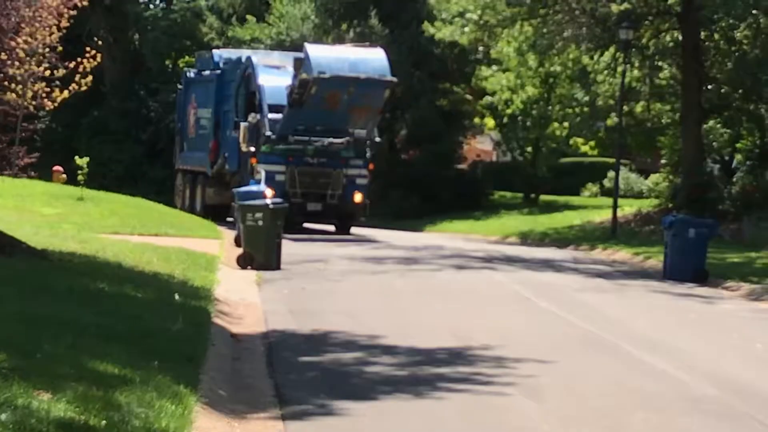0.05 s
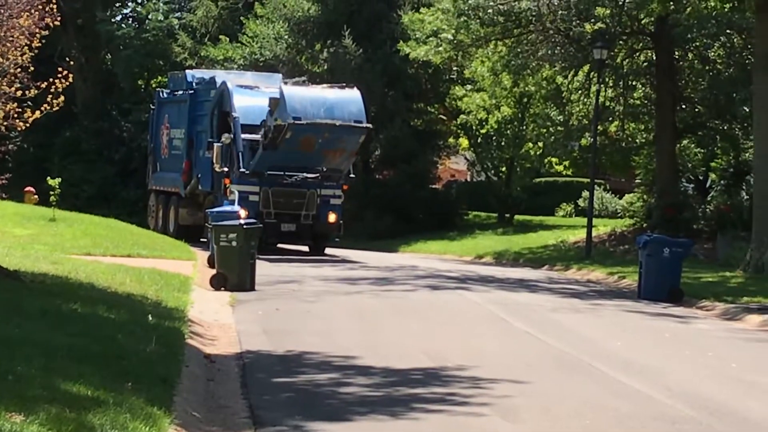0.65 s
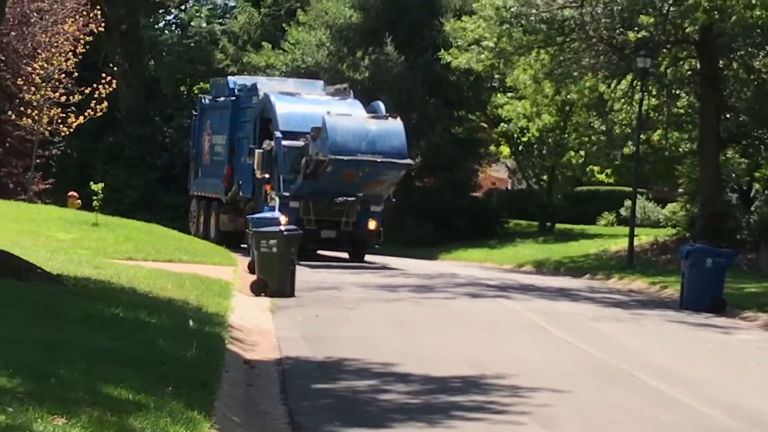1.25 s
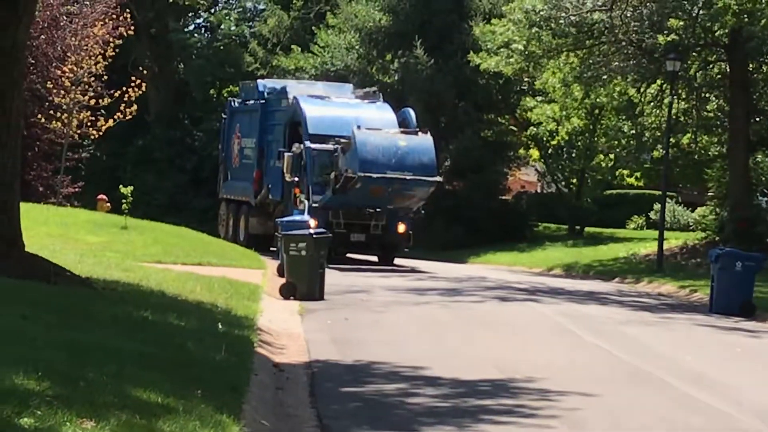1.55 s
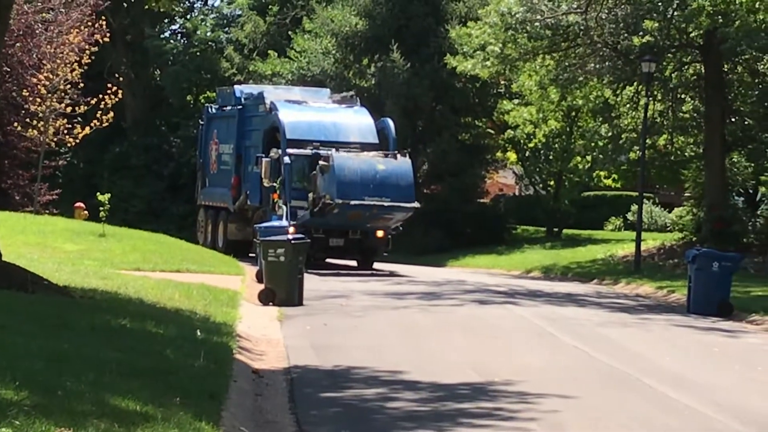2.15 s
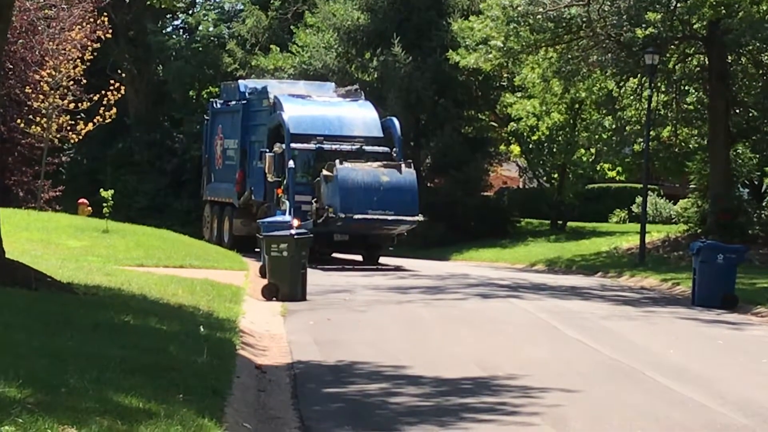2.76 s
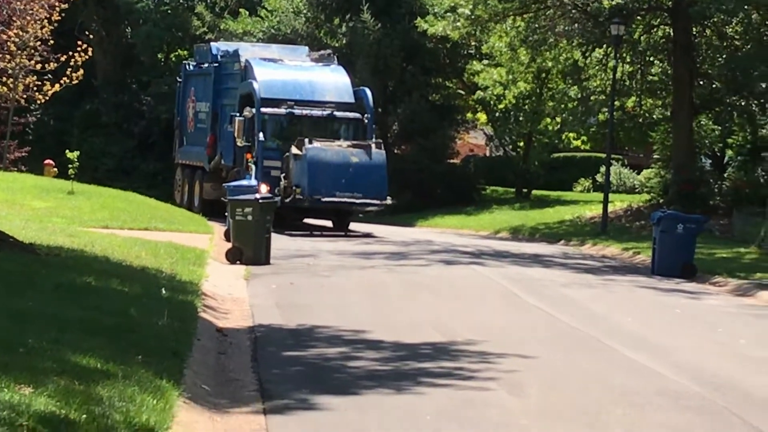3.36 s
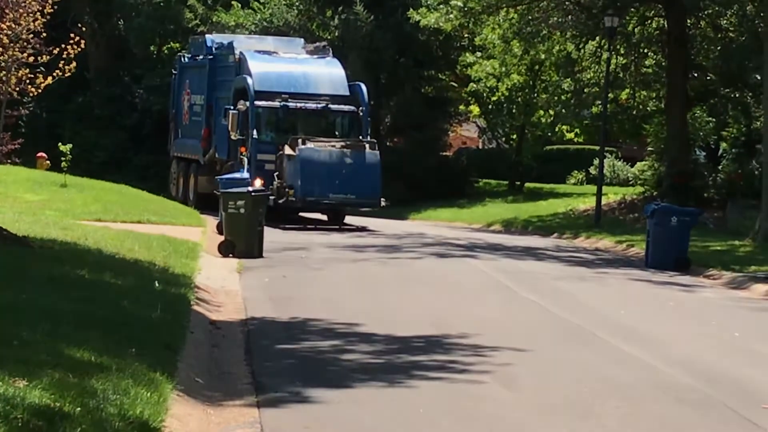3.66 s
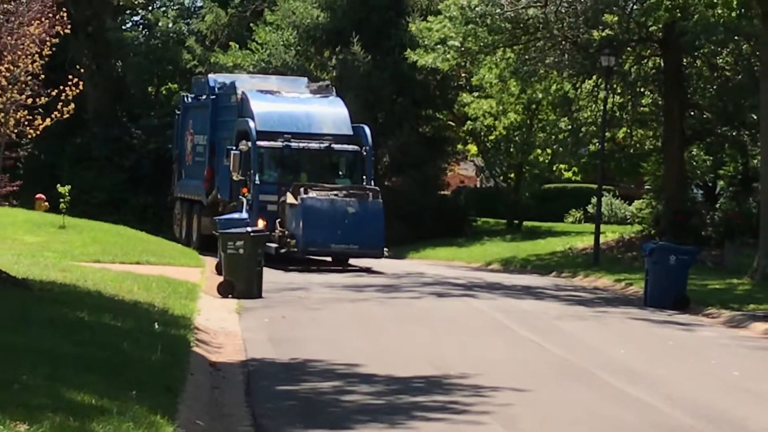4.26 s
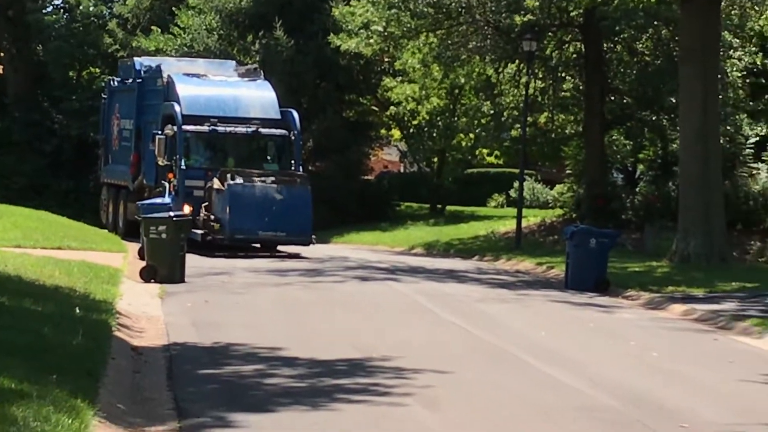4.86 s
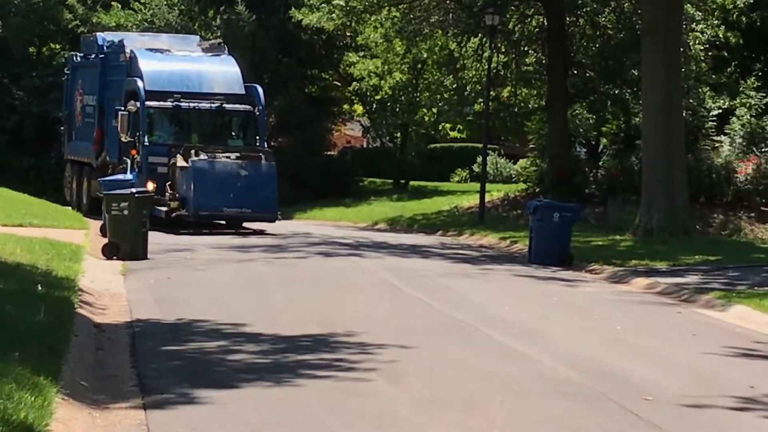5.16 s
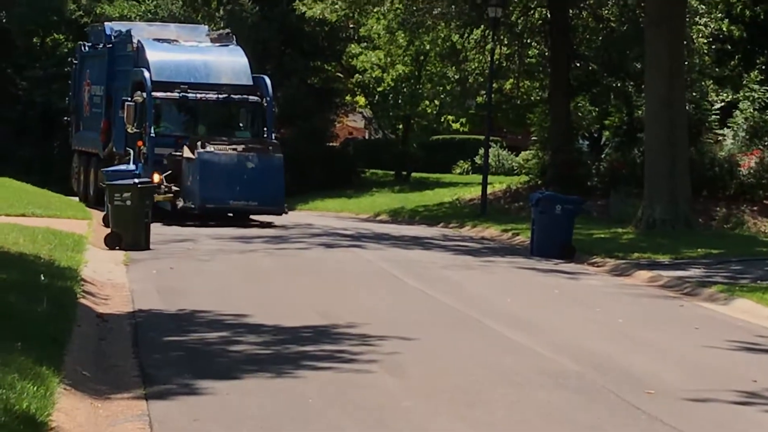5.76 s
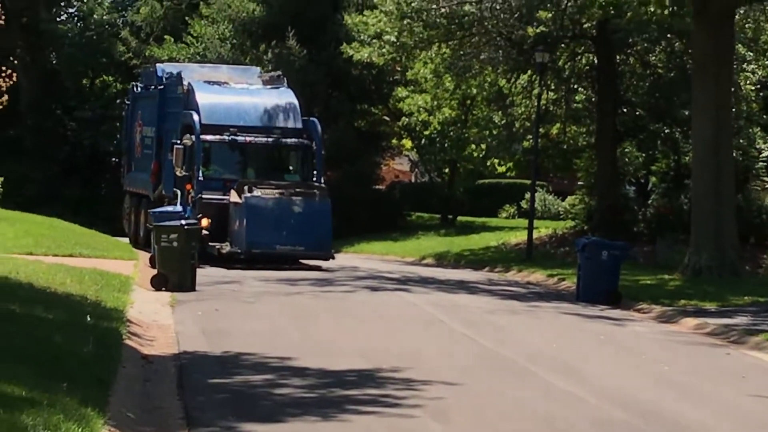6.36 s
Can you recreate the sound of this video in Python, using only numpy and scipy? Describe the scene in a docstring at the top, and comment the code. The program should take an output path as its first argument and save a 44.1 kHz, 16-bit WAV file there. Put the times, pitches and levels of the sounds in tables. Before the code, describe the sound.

On a tree-lined street, a garbage truck's engine throbs loudly before easing down to idle with a burst of compressed air. Faint hydraulic whines and three tiny high chirps follow. Then the truck rolls slowly ahead, its brakes hissing and squealing, its hollow bin booming and loose metal clanking, ending in high brake shrieks and hard knocks that scatter off trees and houses.

```python
"""A garbage truck's diesel roars at raised idle, then drops to idle as its hydraulics whine and a valve vents air.
Uneven cylinder firings make the exhaust note and pulse the engine's roar, rumble and clatter.
After three faint high chirps, perhaps a bird or insect, the truck creeps forward on brakes whose linings
rasp, hiss and squeal on the drums, while the empty steel carry bin booms, the lift arms clank and loose
parts chatter. Trees and house fronts scatter the whines, squeals and knocks along the street."""
import sys
import numpy as np
from scipy import signal
from scipy.fft import rfft, irfft
from scipy.io import wavfile
from scipy.ndimage import uniform_filter1d

SR = 44100
rng = np.random.default_rng(int(sys.argv[2]) if len(sys.argv) > 2 else 0)


def to_wav(sig):
    """Store sig (one row per channel, or 1-D mono) as 16-bit WAV at the path in sys.argv[1].

    Samples outside -1..1 are clipped; the rate is SR.
    """
    pcm = np.clip(np.atleast_2d(sig), -1, 1) * 32767
    pcm = np.round(pcm).astype(np.int16)
    wavfile.write(sys.argv[1], SR, pcm.T)  # frames by channels


N = 286650
T = np.arange(N) / SR
TOP_HZ = 15720  # high cut of the mix


def undb(db):
    """Decibels to gain."""
    return 10 ** (np.asarray(db) / 20)


def unit(x):
    """Scale to rms 1."""
    return x / np.sqrt(np.mean(x ** 2) + 1e-20)


def walk(rate_hz):
    """Smooth random modulation with rms 1."""
    step = max(int(SR / rate_hz), 2)
    stairs = np.repeat(rng.standard_normal(N // step + 1), step)
    return unit(uniform_filter1d(stairs, step)[:N])


def ramp(start, length):
    """Linear rise from 0 to 1."""
    return np.clip((T - start) / length, 0, 1)


def fade(start, t60, attack, hold=0):
    """Percussive envelope: quick attack, optional hold, exponential decay."""
    age = np.maximum(T - start, 0)
    decay = np.log(1000) * np.maximum(age - hold, 0) / t60
    return (1 - np.exp(-age / attack)) * np.exp(-np.minimum(decay, 40))


def swell(age, length, edge_db):
    """Envelope that peaks at age 0, falls by edge_db towards both ends and closes there."""
    away = np.minimum(np.abs(2 * age / length), 1)
    return undb(-edge_db * away ** 2.33) * np.minimum(10 * (1 - away), 1)


def equalise(x, points, resonances=(), size=8192):
    """Minimum-phase EQ from (f/Hz, gain/dB) points plus resonances; white noise keeps its level."""
    f = np.maximum(np.fft.rfftfreq(size, 1 / SR), 1)
    hz, db = np.transpose(points)
    shape_db = np.interp(np.log(f), np.log(hz), db) - 24 * np.log2(np.maximum(hz[0] / f, 1))
    for centre, width, boost in resonances:
        shape_db = shape_db + boost / (1 + (2 * (f - centre) / width) ** 2)
    cepstrum = irfft(np.log(undb(shape_db)))[:size // 2]
    cepstrum[1:] *= 2
    response = irfft(np.exp(rfft(cepstrum, size)))
    return signal.fftconvolve(x, response / np.linalg.norm(response))[:len(x)]


def street(x, wet_db, t60):
    """Direct sound plus sparse reflections from trunks and house fronts."""
    t = T[:SR]
    echoes = rng.standard_normal(SR) * (rng.random(SR) < .02)
    echoes *= np.exp(-np.log(1000) * t / t60) * (t > .008)
    reverb = signal.fftconvolve(x, echoes / np.linalg.norm(echoes))[:N]
    wet = undb(wet_db)
    return (x + wet * reverb) / np.sqrt(1 + wet ** 2)


# Jolts of the rolling truck: t/s, strength/0-1
ROAD_JOLTS = [(3.3, 0), (3.6, 0.2), (4.88, 0.04), (5.17, 0.98), (5.8, 0.89), (6.0, 0.6), (6.5, 0.41)]


def jolting():
    """How hard the road shakes the truck."""
    return np.interp(T, *np.transpose(ROAD_JOLTS))


def governor(drop_s=1.32, drop_length_s=.7, hunt_period_s=0.788, hunt_fade_s=1.3):
    """Load falls smoothly from 1 to 0; the speed then undershoots and hunts until it settles."""
    load = (1 + np.cos(np.pi * ramp(drop_s, drop_length_s))) / 2
    age = np.maximum(T - drop_s - drop_length_s, 0)
    hunt = -np.sin(2 * np.pi * age / hunt_period_s) * np.exp(-age / hunt_fade_s)
    return load, hunt


# Exhaust partials: multiple of the firing rate, loaded level/dB, idle level/dB
EXHAUST_PARTIALS = [(0.998, -54, -60), (1.88, -51, -69), (2, -52, -51.5), (2.29, -49.5, -64.5),
                    (2.65, -51.5, -65), (3, -43, -70), (3.33, -55.5, -59.5), (4.25, -57.5, -61.5),
                    (5, -57, -61)]
# EQ of the fan and pump roar, the low rumble and the diesel clatter: f/Hz, gain/dB
ROAR_EQ = [(18, -61), (30, -4), (48, -18), (81, -11.5), (187, -1.5), (230, -5.5), (307, -12), (389, -18),
           (575, -13.5), (787, -23.5), (1330, -23), (1550, -25.5), (3680, -31.5), (4500, -32.5),
           (5700, -41.5), (7000, -37.5), (8700, -47.5), (9600, -41), (10500, -54), (11500, -43),
           (15500, -60)]
RUMBLE_EQ = [(22, -48), (35, -5.5), (52, -1), (74, -4), (95, -2.5), (120, -4.5), (150, -12.5), (200, -9.5),
             (300, -18.5), (400, -42), (800, -76)]
CLATTER_EQ = [(180, -16.5), (300, 2), (354, -3), (411, -6), (431, -4), (526, -10.5), (641, -3.5),
              (756, -13), (863, -15.5), (907, -12.5), (1330, -13.5), (1750, -14.5), (3280, -17.5),
              (4420, -22.5), (9600, -30), (10600, -34), (15500, -39.5)]
# Cab resonances: f/Hz, width/Hz, boost/dB
CAB_RESONANCES = [(189, 8.4, 4.5), (434.6, 12, 5.5), (573, 55, 3.5), (984, 296, 6.5), (1380, 85, 5.5)]


def engine(raised_hz=61.48, idle_hz=36.24, hunt_hz=1.41, hunt_db=4.5, scatter_db=3, knock=0.19):
    """Uneven diesel firings give the exhaust note and pulse the noise; fan and pump roar only under load."""
    load, hunt = governor()
    firing_hz = idle_hz + (raised_hz - idle_hz) * load + hunt_hz * hunt
    cycles = np.cumsum(firing_hz * (1 + 0.0046 * walk(14))) / SR
    strengths = undb(scatter_db * rng.standard_normal(1000))
    firing = strengths[cycles.astype(int)] * np.exp(-(cycles % 1) / 0.89)
    gate = unit(1 + knock * unit(firing))
    # under load the note throbs unevenly, every three or four firings
    throb = 1 + 0.24 * load * np.sin(2 * np.pi * cycles / 3.4 + walk(7.3))
    note = 0
    for multiple, loaded_db, idle_db in EXHAUST_PARTIALS:
        gain = throb * undb(idle_db + load * (loaded_db - idle_db) + 2 * walk(18))
        note += np.sqrt(2) * gain * np.sin(2 * np.pi * (multiple * cycles + rng.random()))
    roar = equalise(gate * rng.standard_normal(N), ROAR_EQ, CAB_RESONANCES)
    roar *= undb(-41.5) * load ** 0.64
    rumble = equalise(gate * rng.standard_normal(N), RUMBLE_EQ)
    rumble *= undb(-49 + 0.5 * load + 11.5 * jolting())
    clatter = equalise(gate * rng.standard_normal(N), CLATTER_EQ, CAB_RESONANCES[2:])
    clatter *= undb(-57 + 8 * load + 2 * hunt)
    return (note + rumble) * undb(hunt_db * hunt) + roar + clatter


# Pump whines: peak t/s, length/s, f/Hz, level/dB, waver/share of pitch
PUMP_WHINES = [(2.059, 0.96, 1547, -61.5, 0.031), (2.6, 1.0, 1058, -69, .03),
               (2.87, 0.16, 745, -58.5, .004), (3.07, 0.5, 742, -62.5, .004),
               (4.5, 0.47, 1436, -63.5, 0.0176), (4.5, 0.4, 1790, -67, 0.017)]


def hydraulic_pump(sag_per_s=0.072, flutter_db=1.2):
    """The pump sings in faint, fluttering whines, each sagging a little in pitch."""
    whines = 0
    for s, length, hz, db, waver in PUMP_WHINES:
        pitch = hz * (1 - sag_per_s * (T - s) + waver * walk(260))
        tone = np.sin(2 * np.pi * np.cumsum(pitch) / SR)
        whines += undb(db) * swell(T - s, length, edge_db=9) * tone
    return street(whines * undb(flutter_db * walk(70)), wet_db=0, t60=0.32)


# Air blasts: t/s, level/dB, hold/s, low-band t60/s
AIR_BLASTS = [(1.794, -39.5, 0.046, 0.97), (3.397, -58, 0.037, 0.44)]
# EQ of the jet: f/Hz, gain/dB
JET_EQ = [(600, -14), (1100, -0.5), (2000, -2.5), (2600, 2), (3200, 3.5), (4400, 4.5), (5200, 1.5),
          (6200, 4), (9700, 3), (10500, -0.5), (12800, 0.5), (15500, -8)]
# Outlet resonances: f/Hz, width/Hz, boost/dB
OUTLET_RESONANCES = [(3540, 280, 1.5), (4580, 210, 1), (8330, 130, 3)]


def air_valve(attack_s=0.027, split_hz=9500, treble_t60_share=0.57, flutter_db=0.98):
    """Short jets of compressed air bloom and die away, treble first."""
    hiss = 0
    for side, share in (("low", 1), ("high", treble_t60_share)):
        jet = equalise(rng.standard_normal(N), JET_EQ, OUTLET_RESONANCES)
        band = signal.sosfilt(signal.butter(2, split_hz, side, fs=SR, output="sos"), jet)
        envelope = sum(undb(db) * fade(s, share * t60, attack_s, hold) for s, db, hold, t60 in AIR_BLASTS)
        hiss += band * envelope
    return hiss * undb(flutter_db * walk(70))


# Three faint chirps near 9.4 kHz, then brake lining rasps: peak t/s, length/s, f/Hz, width/Hz, level/dB
CHIRPS_AND_RASPS = [(2.272, .1, 9350, 350, -77), (2.504, .11, 9350, 350, -73),
                    (2.837, 0.091, 9380, 356, -76), (3.26, 0.25, 8040, 1900, -66.5),
                    (3.587, 0.12, 10070, 200, -61), (3.663, 0.31, 7700, 560, -54),
                    (4.13, 0.34, 4500, 350, -64)]


def chirps_and_rasps(grit_db=1.5):
    """Narrow noise bands: faint high chirps, perhaps a bird or insect, then linings rasping on the drums."""
    bursts = 0
    for s, length, hz, width, db in CHIRPS_AND_RASPS:
        bandpass = signal.butter(2, [hz - width / 2, hz + width / 2], "band", fs=SR, output="sos")
        band = unit(signal.sosfilt(bandpass, rng.standard_normal(N)))
        bursts += undb(db) * band * swell(T - s, length, edge_db=13)
    return bursts * undb(grit_db * walk(90))


# EQ of the friction hiss: f/Hz, gain/dB
FRICTION_EQ = [(1500, 3), (2400, -12), (3300, -2.5), (4000, -3.5), (4550, -4), (5200, -9.5), (6300, -6),
               (7100, -2.5), (8000, -5), (9600, -2.5), (10500, -13.5), (12000, -12), (15000, -24)]
# Brake drum resonances: f/Hz, width/Hz, relative boost/dB
DRUM_RESONANCES = [(3530, 110, 6), (4580, 170, 6), (6930, 80, 8), (7120, 70, 7), (7810, 110, 9.5),
                   (8500, 140, 7), (9120, 90, 10), (9670, 110, 8), (9900, 120, 8), (10200, 100, 7),
                   (10600, 110, 8), (11000, 110, 7), (11350, 120, 7)]


def brake_rub(on_s=3.254, attack_s=0.37, off_s=4.5, release_s=0.32, rub_db=-57.5, drag_db=-92):
    """Dragging linings hiss through the drums' resonances, which come and go with the contact."""
    hiss = equalise(rng.standard_normal(N), FRICTION_EQ)
    rings = 0
    for hz, width, boost in DRUM_RESONANCES:
        contact = undb(3 * walk(12))
        ring = signal.lfilter(*signal.iirpeak(hz, hz / width, fs=SR), hiss)
        rings += (undb(boost) - 1) * contact * ring
    pressure = ramp(on_s, attack_s) * (undb(rub_db) * (1 - ramp(off_s, release_s)) + undb(drag_db))
    flutter = undb(2.3 * walk(15))
    return unit(hiss + undb(-2) * rings) * pressure * flutter


# Lift arm and bin hits: t/s, thud level/dB, clank level/dB, low ring f/Hz, high ring f/Hz,
# tilt/dB per octave (the harder the contact, the brighter)
ARM_HITS = [(3.58, -46, -49, 550, 900, -9), (3.606, -44, -45, 600, 900, -15),
            (3.623, -48, -47, 530, 716, -4), (3.872, -40, -51, 556, 1097, -14),
            (3.985, -41, -50, 1130, 1500, -8), (4.02, -45, -43, 594, 1050, -8),
            (4.036, -49, -46.5, 626, 1000, -10), (4.09, -43, -53, 634, 1010, -9),
            (4.953, -44.5, -50.5, 2500, 3100, 4), (5.014, -36, -49, 2500, 3200, 2),
            (5.105, -43.5, -45, 850, 1310, -4.5), (5.186, -38, -43.5, 2530, 3000, 2),
            (5.217, -43.5, -42.5, 400, 596, -4), (5.243, -55, -48, 8800, 11300, 10),
            (5.255, -44, -42, 3140, 3700, -1.5), (5.31, -48, -52, 600, 1000, -7),
            (5.374, -45.5, -42.5, 2200, 2500, -5.5), (5.387, -46, -49, 1160, 1570, -5),
            (5.442, -42, -39, 2420, 3700, -2.5), (5.513, -47, -41, 3200, 5970, 1.5),
            (5.545, -52, -43.5, 2670, 6000, -1.5), (5.583, -59, -39.5, 790, 2000, -6),
            (5.587, -63, -48, 544, 3150, -4), (5.644, -39, -50, 1000, 1900, 2),
            (5.684, -38.5, -37.5, 1080, 2870, 0), (5.72, -46, -49, 1000, 3430, 0),
            (5.751, -41.5, -48, 1000, 3500, -1), (5.768, -51, -40, 587, 964, -6),
            (5.81, -52, -49.5, 1940, 3200, -1), (5.869, -50, -51.5, 600, 6040, -2),
            (5.991, -43, -46, 2500, 4100, 0), (6.035, -62, -48, 2500, 3000, -3.5),
            (6.205, -49, -48.5, 1260, 1630, -5.5), (6.423, -34, -40.5, 2720, 3900, 0),
            (6.446, -39.5, -34.5, 605, 1080, -4), (6.455, -31.5, -35, 560, 1060, -6.5),
            (6.48, -37, -38, 520, 1120, -3)]
# EQ of the body panels and of struck steel: f/Hz, gain/dB
PANEL_EQ = [(70, -18), (130, 8), (200, 5.5), (310, -3), (420, -8.5), (620, -4.5), (800, -15), (1050, -10.5),
            (1600, -17), (2500, -26.5), (6000, -48.5)]
STEEL_EQ = [(600, 0), (1500, -4), (2500, 0.5), (4200, -0.5), (5500, -5), (7500, -6), (10000, -15.5),
            (15500, -31)]


def ironwork(shake_db=-47, aftershake_db=-4.5, ring_width_hz=240, ring_db=9.5, contacts_per_s=300):
    """Knocks thud in the panels and ring the steel; loose parts chatter with the jolts and after each hit."""
    thuds, clanks = 0, np.zeros(N + SR)
    shake_power = (undb(shake_db) * jolting() ** 1.46) ** 2
    strike = fade(0, t60=.042, attack=0.00083, hold=.007)[:SR // 2]
    for s, thud_db, clank_db, low_hz, high_hz, tilt in ARM_HITS:
        thuds += undb(thud_db) * fade(s, t60=0.18, attack=0.0096)
        shake_power += (undb(thud_db + aftershake_db) * fade(s, t60=0.65, attack=0.0025)) ** 2
        spectrum = [(hz, db + tilt * np.log2(hz / low_hz)) for hz, db in STEEL_EQ]
        rings = [(hz, ring_width_hz, ring_db) for hz in (low_hz, high_hz)]
        clank = equalise(rng.standard_normal(len(strike)) * strike, spectrum, rings)
        i = int(s * SR)
        clanks[i:i + len(strike)] += undb(clank_db) * clank * np.linalg.norm(strike) / np.linalg.norm(clank)
    contacts = (rng.random(N) < contacts_per_s / SR) * undb(3 * np.minimum(rng.exponential(size=N), 3))
    tick = np.exp(-T[:SR // 10] / 0.0054)
    chatter = unit(signal.fftconvolve(contacts, tick)[:N]) * np.sqrt(shake_power)
    panels = equalise((thuds + chatter) * rng.standard_normal(N), PANEL_EQ)
    jingle = equalise(chatter * rng.standard_normal(N), STEEL_EQ) * undb(-11) * np.sqrt(jolting())
    # the arms face the listener, so their clanks arrive drier than the body's rattle
    return street(panels + jingle, wet_db=-2.5, t60=0.55) + street(clanks[:N], wet_db=-4.5, t60=0.46)


# Flexes of the empty bin: t/s, level/dB, centre f/Hz
BIN_FLEXES = [(3.579, -27, 152), (3.612, -34, 230), (3.646, -28, 114), (3.721, -27, 113), (3.867, -30, 122),
              (3.915, -33.5, 170), (4.015, -33, 159), (4.094, -28.5, 135), (4.167, -37, 137),
              (4.264, -34.5, 126), (4.77, -29, 77), (5.094, -21, 81), (5.215, -28, 117), (5.388, -20, 76),
              (5.68, -25.5, 105), (5.756, -29, 138), (6.235, -32, 72), (6.465, -29, 127)]
# Its wall modes: f/Hz, t60/s
WALL_MODES = [(52, 0.38), (73, 0.14), (95, 0.077), (121.5, 0.57), (137, 0.52), (184, 0.2), (222, 0.54),
              (262, 0.25)]


def bin_booms(reach_octaves=0.28, attack_s=0.0039):
    """Soft pushes ring the bin's wall modes, most strongly those near each push's own pitch."""
    booms = np.zeros(N + SR)
    t = T[:SR]
    mode_hz, t60 = np.transpose(WALL_MODES)
    envelopes = np.exp(-np.log(1000) * t / t60[:, None]) * (1 - np.exp(-t / attack_s))
    rings = np.sin(2 * np.pi * mode_hz[:, None] * t) * envelopes
    for s, db, hz in BIN_FLEXES:
        share = 1 / (1 + (np.log2(mode_hz / hz) / reach_octaves) ** 2)
        i = int(s * SR)
        booms[i:i + SR] += undb(db) * (share / np.linalg.norm(share)) @ rings
    return booms[:N]


# Brake squeals: peak t/s, length/s, f/Hz, glide/Hz per s, level/dB
DRUM_SQUEALS = [ (3.657, .1, 9330, -200, -53), (3.77, 0.15, 9308, -100, -50), (3.863, .12, 9270, -200, -59),
                (3.66, 0.11, 3740, 0, -56), (3.762, 0.071, 3746, -200, -53),
                (3.825, .048, 3756, 300, -48.5), (3.882, 0.044, 3772, -200, -49.5),
                (3.943, .04, 3755, 2, -65), (4.022, 0.054, 3755, 0, -60), (3.795, .09, 6170, -600, -52.5),
                (3.845, .05, 6150, 0, -57), (3.915, 0.093, 6148, 0, -52), (3.995, 0.1, 6175, 708, -63),
                (4.57, 0.79, 9640, -230, -65.5), (4.741, 0.53, 6457, -59, -52),
                (4.647, 0.48, 8545, -130, -70), (4.92, 0.49, 9550, -100, -60),
                (4.958, 0.1, 5425, -100, -65), (5.056, 0.063, 5405, -100, -58),
                (5.114, 0.065, 5390, -100, -55), (5.18, .06, 5392, 0, -66),
                (5.305, 0.066, 5410, -60, -61.5), (5.519, 0.15, 5428, 4, -58),
                (6.122, .16, 9260, -300, -62), (6.17, 0.16, 13980, 298, -75),
                (6.196, 0.11, 8530, -300, -62), (6.238, 0.13, 11340, 0, -68), (6.277, 0.17, 7210, 200, -60),
                (6.29, 0.16, 8380, 202, -63), (6.35, 0.25, 8160, 0, -61.5), (6.29, 0.18, 12500, 700, -61),
                (6.42, 0.22, 12700, 200, -68), (6.42, 0.2, 13210, 0, -68), (6.38, 0.2, 15500, 1498, -76),
                (6.447, 0.23, 6420, 398, -53.5), (6.49, 0.08, 10470, 0, -63)]


def brake_squeals(octave_db=-24, stutter_db=7.5, full_stutter_s=0.22, waver=0.0018):
    """Linings lock onto one drum mode after another; each squeal swells, glides and dies, long ones stutter."""
    squeals = np.zeros(N)
    wander, flutter = walk(160), walk(55)
    for s, length, hz, glide, db in DRUM_SQUEALS:
        on = np.abs(T - s) < length / 2
        age, shift = T[on] - s, rng.integers(N)
        # a fast-gliding squeal is less firmly locked and wavers more
        waver_hz = waver * hz + 0.015 * abs(glide)
        pitch = hz + glide * age + waver_hz * np.roll(wander, shift)[on]
        # friction caps the swing, so the stutter dips further than it swells
        stutter = np.minimum(np.roll(flutter, shift)[on], 1) * min(length / full_stutter_s, 1)
        gain = undb(db + stutter_db * stutter) * swell(age, length, edge_db=16)
        phase = 2 * np.pi * np.cumsum(pitch) / SR
        octave = undb(octave_db) * (2 * hz < TOP_HZ)
        squeals[on] += np.sqrt(2) * gain * (np.sin(phase) + octave * np.sin(2 * phase))
    return street(squeals, wet_db=-7.5, t60=0.76)


# Pitch and level curves of the two shrieking brakes: t/s, f/Hz, level/dB
LOW_BRAKE = [(5.62, 6300, -79), (5.65, 6300, -53), (5.755, 6240, -61), (5.772, 6230, -43),
             (5.815, 6170, -65), (5.837, 6190, -49), (5.888, 6190, -63), (5.91, 6250, -45.5),
             (5.96, 6155, -54), (5.985, 6256, -39), (6.03, 6325, -55), (6.07, 6390, -40), (6.12, 6350, -66),
             (6.24, 6200, -68)]
HIGH_BRAKE = [(6.1, 9600, -72), (6.13, 9550, -51), (6.17, 9700, -55), (6.21, 9770, -50), (6.266, 9780, -57),
              (6.29, 9700, -46), (6.32, 9640, -62), (6.39, 9735, -40), (6.42, 9760, -57),
              (6.446, 9970, -54), (6.52, 10150, -72)]


def stopping_shrieks(waver=0.00209, flutter_db=5, octave_db=-66.5, grip_s=5.88):
    """Two brakes shriek as the truck stops; echoes of the earlier pitch beat against each gliding tone."""
    shrieks = 0
    for brake in (LOW_BRAKE, HIGH_BRAKE):
        s, hz, db = np.transpose(brake)
        pitch = np.interp(T, s, hz) * (1 + waver * walk(220))
        phase = 2 * np.pi * np.cumsum(pitch) / SR
        on = (T > s[0]) & (T < s[-1])
        gain = undb(np.interp(T, s, db) + flutter_db * np.minimum(walk(70), 1)) * on
        # the lower brake adds its octave while the lining grips hardest
        grip = swell(T - grip_s, length=0.46, edge_db=5)
        octave = undb(octave_db + 4 * walk(40)) * grip * (2 * hz.mean() < TOP_HZ)
        shrieks += np.sqrt(2) * (gain * np.sin(phase) + octave * np.sin(2 * phase))
    return street(shrieks, wet_db=-2.5, t60=0.55)


def scene():
    """The whole street, mixed to mono."""
    highs = brake_squeals() + stopping_shrieks() + chirps_and_rasps() + brake_rub()
    return (engine() + hydraulic_pump() + air_valve() + highs + bin_booms() + ironwork())[None]


def record(dry):
    """A low cut drops the deepest bass and a steep high cut trims the top."""
    low_cut = signal.butter(6, 39, "high", fs=SR, output="sos")
    high_cut = signal.ellip(12, .1, 80, TOP_HZ, fs=SR, output="sos")
    return signal.sosfilt(high_cut, signal.sosfilt(low_cut, dry))


dry = scene()
out = record(dry)
to_wav(out)
```